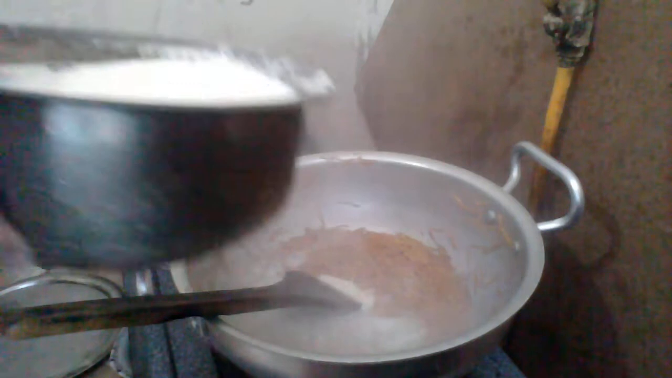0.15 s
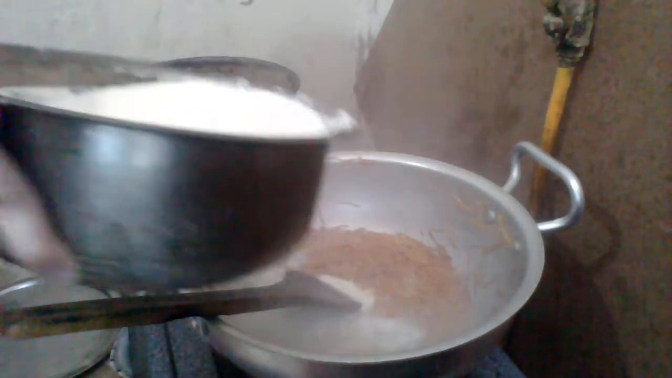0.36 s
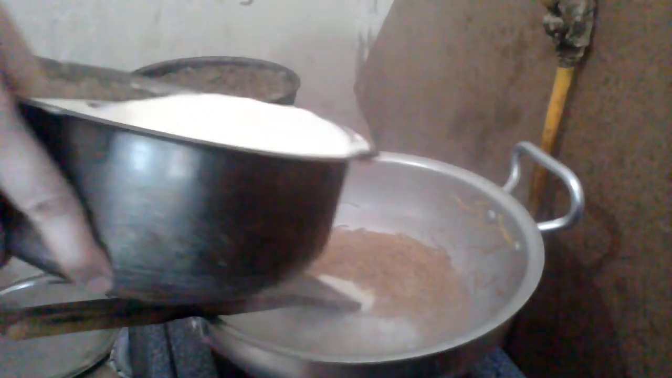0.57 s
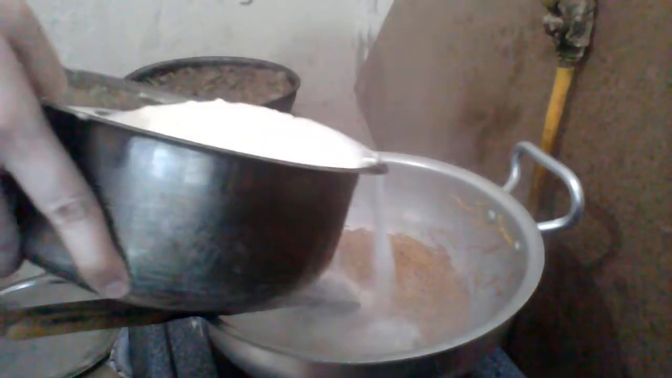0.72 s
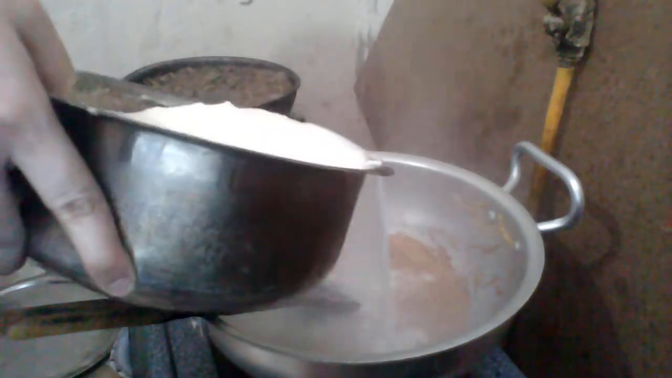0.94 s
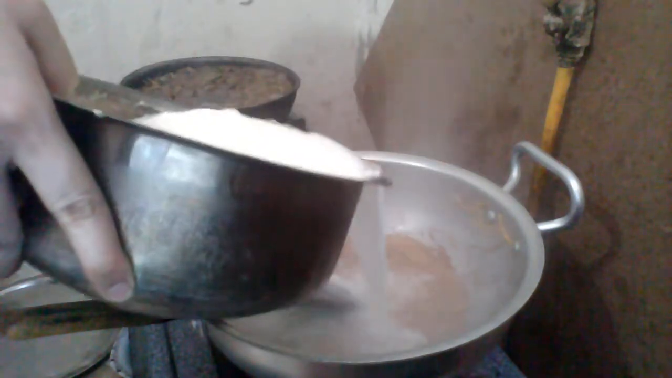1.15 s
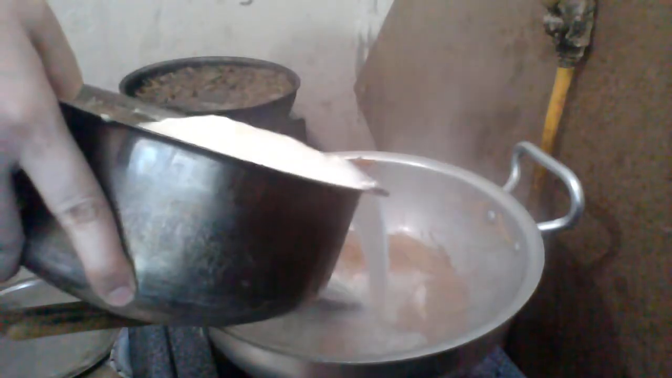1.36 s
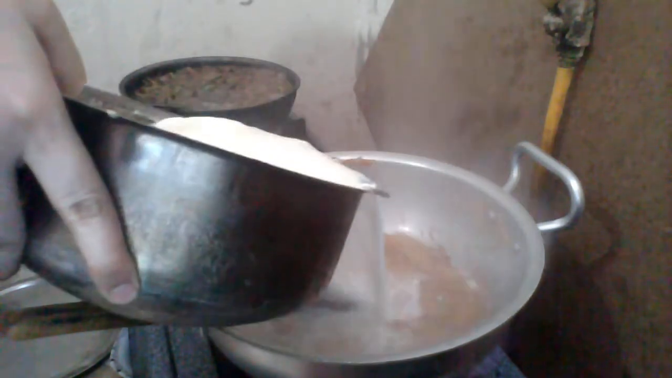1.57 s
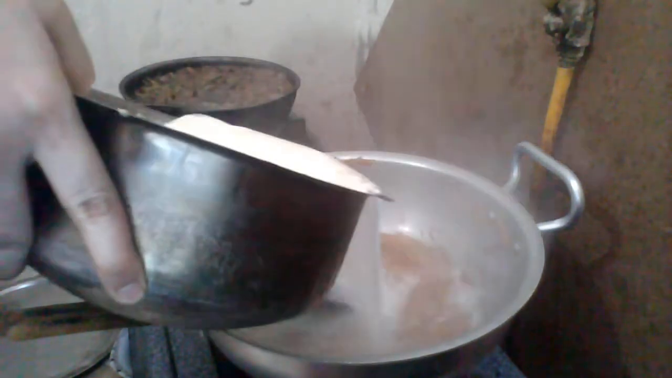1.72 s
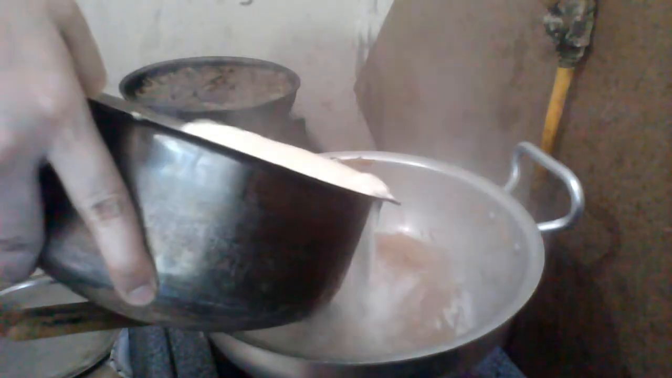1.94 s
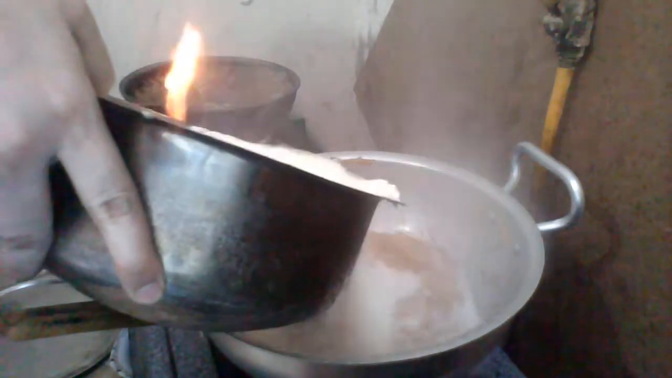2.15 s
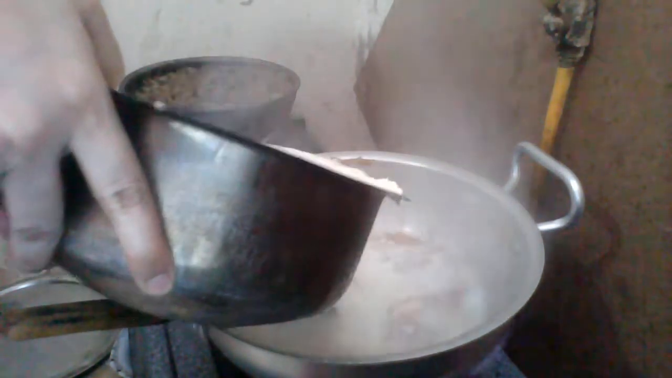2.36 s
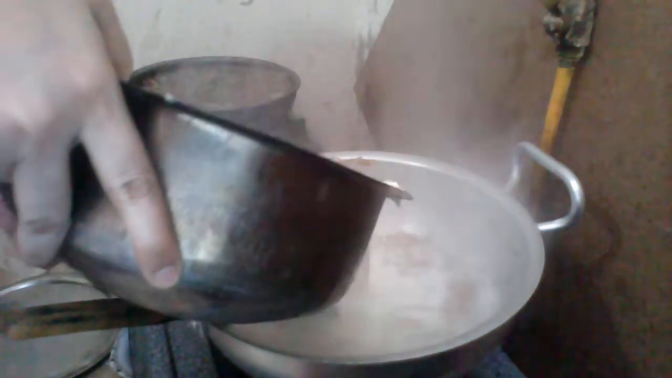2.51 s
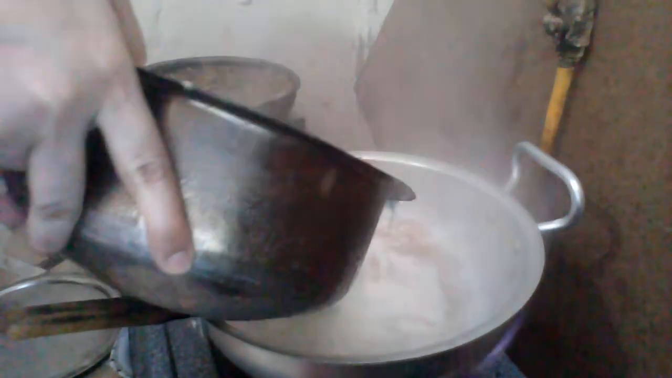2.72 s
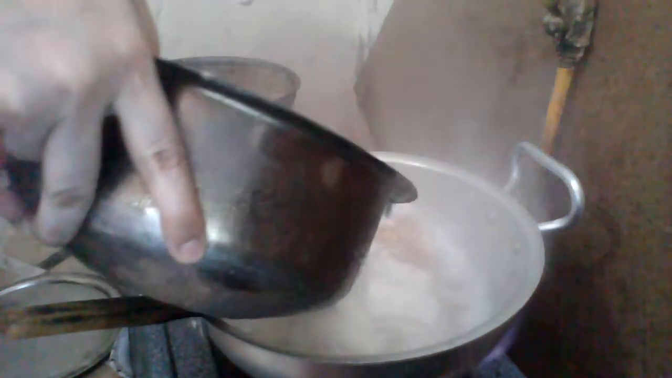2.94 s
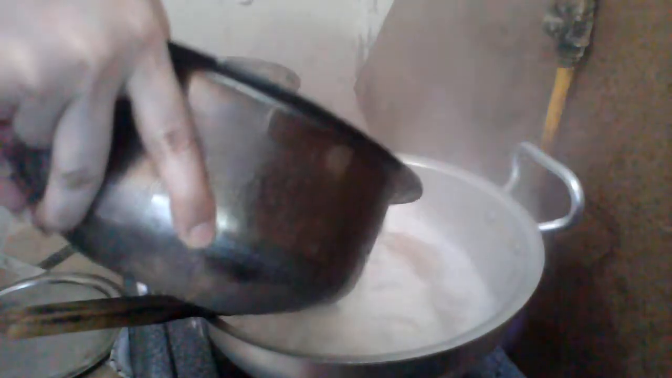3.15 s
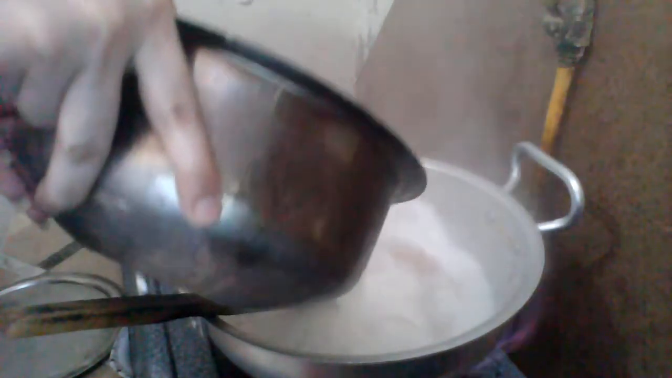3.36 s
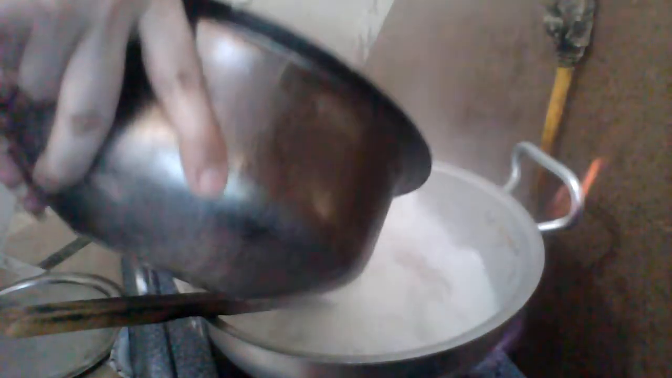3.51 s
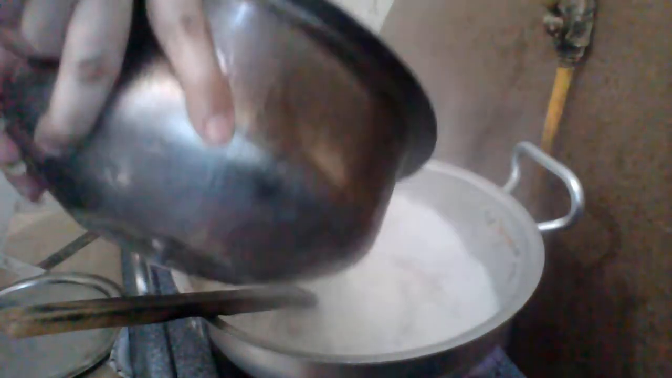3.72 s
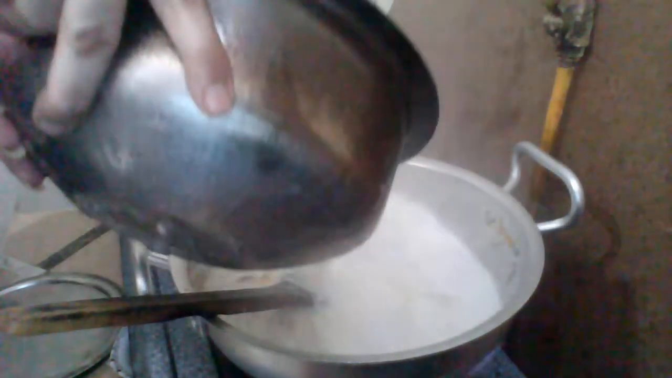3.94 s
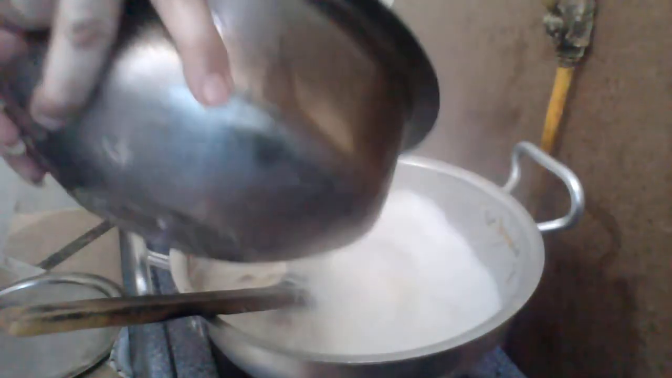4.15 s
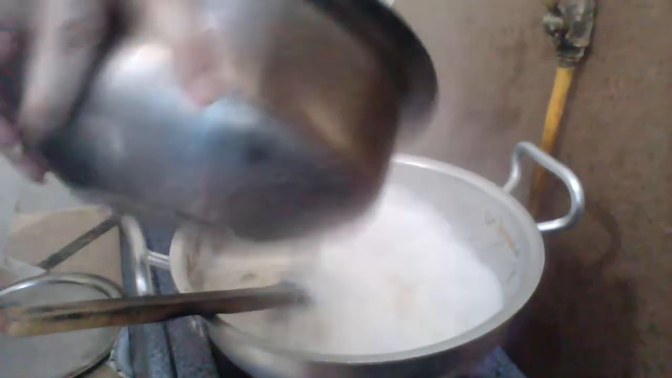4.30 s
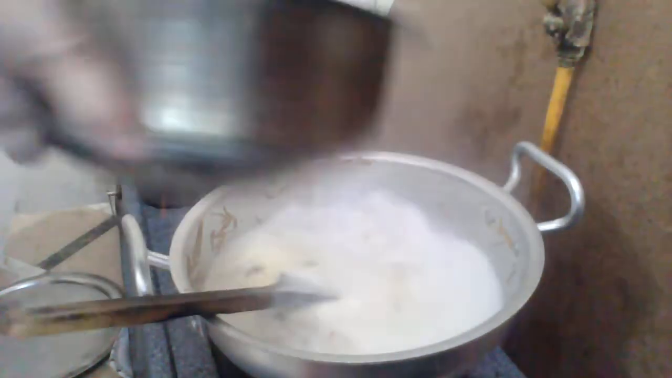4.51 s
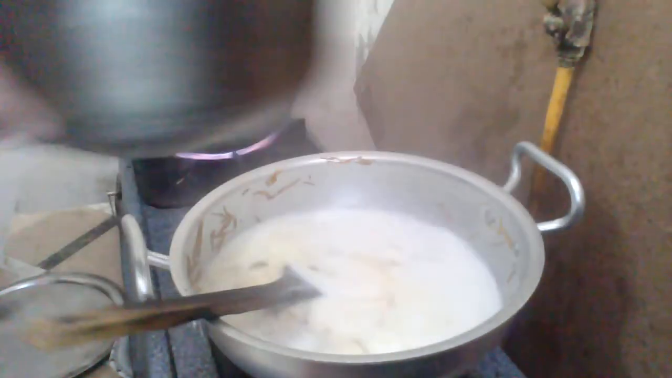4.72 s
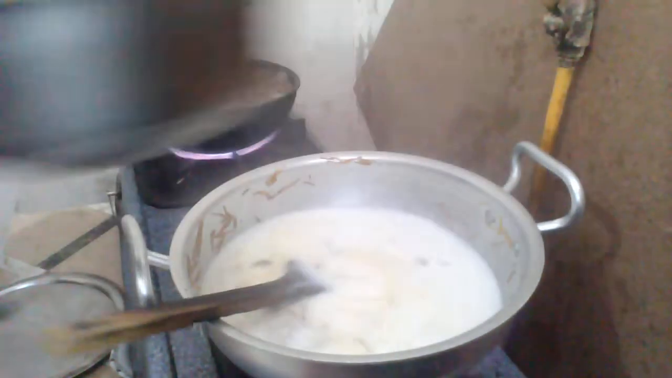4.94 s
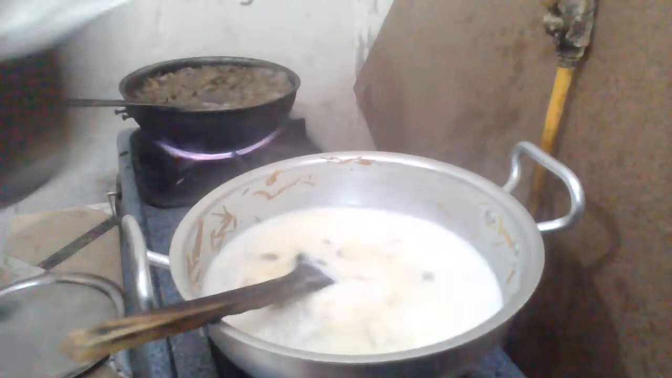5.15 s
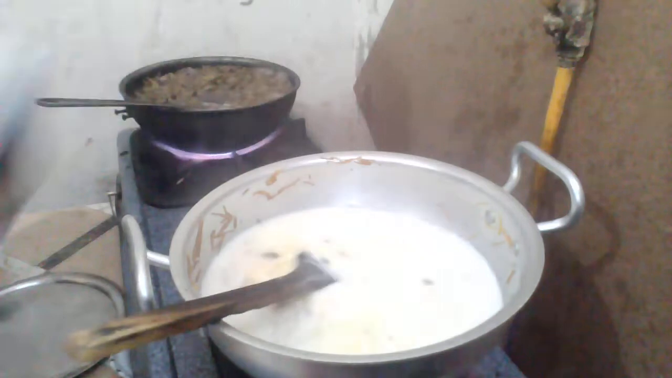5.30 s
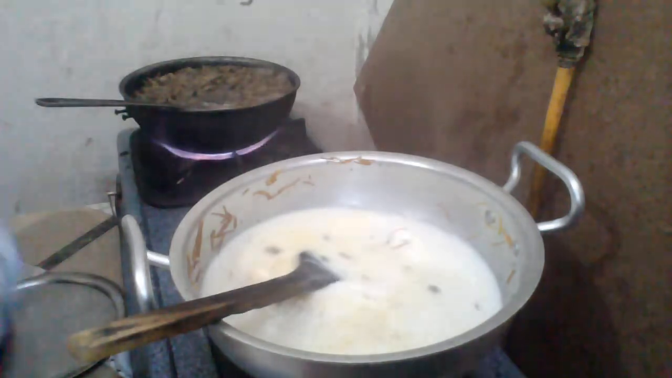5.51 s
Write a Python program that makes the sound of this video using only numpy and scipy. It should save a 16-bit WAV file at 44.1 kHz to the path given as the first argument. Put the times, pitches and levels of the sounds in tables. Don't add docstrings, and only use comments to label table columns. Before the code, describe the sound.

A steady fry hiss swells into singing, crackling steam as milk floods a hot pan, then dies away, heard through a thin voice link.

```python
import sys
import numpy as np
from scipy import signal
from scipy.fft import rfft, irfft, next_fast_len
from scipy.io import wavfile
from scipy.ndimage import uniform_filter1d, map_coordinates

SR = 44100
rng = np.random.default_rng(int(sys.argv[2]) if len(sys.argv) > 2 else 0)


def ratio(d):
    e = np.asarray(d, float) / 20
    return 10 ** e


def int16_out(signal):
    q = np.round(np.clip(np.atleast_2d(signal).T, -1, 1) * 32767)
    wavfile.write(sys.argv[1], SR, q.astype(np.int16))


N = 245504
TIME = np.arange(N) / SR


def unit(x):
    return x / np.sqrt(np.mean(x ** 2) + 1e-20)


def curves(rows):
    s, *columns = np.transpose(rows)
    return [np.interp(TIME, s, column) for column in columns]


def wobble(rate):
    knots = rng.standard_normal(int(N * rate / SR) + 4)
    return map_coordinates(knots, [np.arange(N) * rate / SR])


def coloured(x, spectrum):
    m = 2 * next_fast_len(N // 2 + 8192)
    hz, db = np.transpose(spectrum)
    log_hz = np.log(np.fft.rfftfreq(m, 1 / SR) + 1)
    gain = ratio(np.interp(log_hz, np.log(hz + 1), db, left=-90, right=-90))
    cepstrum = irfft(np.log(gain), m)
    cepstrum[1:m // 2] *= 2
    cepstrum[m // 2 + 1:] = 0
    response = np.exp(rfft(cepstrum))
    return unit(irfft(rfft(x, m) * response, m)[:N])


def rush(patchy_db, flutter_db):
    z = signal.stft(rng.standard_normal(N + 512), nperseg=512)[2]
    patches = uniform_filter1d(rng.standard_normal(z.shape), size=5, axis=0)
    patches = uniform_filter1d(patches, size=9, axis=1)
    noise = signal.istft(z * ratio(patchy_db * unit(patches)), nperseg=512)[1][:N]
    flutter = wobble(25) + 0.36 * wobble(8.8)
    return unit(noise * ratio(flutter_db * flutter))


def crackle(per_second, spread_db):
    chance, side, strength = rng.random((3, N))
    clicks = (chance < per_second / SR) * np.sign(side - .5)
    return unit(clicks * ratio(-spread_db * np.log(strength + .025)))


# (frequency [Hz], level [dB per Hz])
HOLLOW_HISS = [(250, -42.5), (430, -14.5), (531, -7), (576, -4.5), (695, -16), (817, -12.5), (969, -3),
               (1170, 3.5), (1260, 0), (1430, -5), (1700, 2), (2050, -0.5), (2610, 1), (2830, -7),
               (3000, -4), (3900, -22.5), (6600, -120)]
# (frequency [Hz], level [dB per Hz])
FAT_FIZZ = [(1530, -33), (2600, -2.5), (2910, -7.5), (3160, -1.5), (3850, -1.5), (4230, -4.5), (6260, -6),
            (7080, -13), (7530, -28), (8040, -43), (10500, -80), (17700, -120)]
# (time [s], level [dB])
FRYING = [(0.0, -56), (0.4, -56.5), (0.7, -57.5), (1.21, -54.5), (1.56, -52.5), (1.78, -52), (1.98, -52.5),
          (2.21, -52.5), (2.38, -51), (2.51, -47.5), (2.74, -55), (2.93, -55.5), (3.3, -56.5),
          (3.58, -59.5), (4.06, -60.5), (4.32, -64.5), (5.37, -71), (5.56, -72)]
# (time [s], delay [ms], share of the direct sound)
BOWL_ECHO = [
    (0, 0.91, 0.12),
    (.3, 0.23, 0.086),
    (.6, 0.25, 0.085),
    (1, 0.2, 0.18),
    (1.3, 0.19, 0.2),
    (5.57, 0.15, 0.026),
]


def sizzle():
    dry_fizz_db, wet_fizz_db, covered_s = -2, 0.68, 2.65
    heat_db, = curves(FRYING)
    fizz_db = heat_db + np.where(TIME < covered_s, dry_fizz_db, wet_fizz_db)
    fizz_db = uniform_filter1d(fizz_db, size=SR // 4)
    drops = crackle(900, spread_db=4.5)
    body = coloured(rush(patchy_db=1.0, flutter_db=0.92) + 0.4 * drops, HOLLOW_HISS)
    fizz = coloured(rush(patchy_db=1.18, flutter_db=0.93) + 0.55 * drops, FAT_FIZZ)
    hiss = ratio(heat_db + 9) * body + ratio(fizz_db + 10.0) * fizz
    delay_ms, share = curves(BOWL_ECHO)
    echo = map_coordinates(hiss, [np.arange(N) - delay_ms * SR / 1000], mode="nearest")
    return (hiss + share * echo) / np.sqrt(1 + share ** 2)


# (time [s], length [s], frequency [Hz], rms level [dB])
STEAM_POCKETS = [(0.972, 0.19, 947, -56.5), (1.021, 0.087, 1790, -52.5), (1.208, 0.22, 569.6, -56.5),
                 (1.257, 0.15, 5000, -58), (1.271, 0.043, 1653, -46.5), (1.407, 0.15, 1623, -49),
                 (1.421, 0.17, 1060, -46.5), (1.455, 0.14, 5920, -51.5), (1.528, 0.09, 1304, -49.5),
                 (1.529, 0.065, 2175, -48), (1.543, 0.061, 5000, -48.5), (1.547, .096, 3200, -45.5),
                 (1.547, 0.15, 6520, -55.5), (1.569, 0.1, 1708, -40), (1.588, 0.19, 619, -53),
                 (1.641, 0.2, 2295, -43), (1.653, 0.2, 3250, -44), (1.674, 0.08, 6670, -54.5),
                 (1.674, 0.16, 5020, -51.5), (1.682, 0.19, 1635, -41.5), (1.711, 0.15, 1250, -45),
                 (1.714, 0.15, 993, -45.5), (1.718, 0.13, 1850, -43.5), (1.741, 0.16, 5650, -54.5),
                 (1.776, 0.22, 615, -51), (1.822, 0.028, 2164, -42.5), (1.861, 0.096, 3230, -53),
                 (1.878, 0.17, 1673, -45), (1.898, 0.11, 2660, -43.5), (1.922, 0.088, 997, -45.5),
                 (1.959, 0.11, 6500, -52), (1.974, 0.12, 1139, -50.5), (2.011, 0.18, 4980, -51.5),
                 (2.02, 0.36, 1630, -46.5), (2.069, 0.21, 5520, -50.5), (2.107, 0.26, 2635, -46.5),
                 (2.113, 0.071, 3750, -47.5), (2.113, 0.37, 539.4, -53.5), (2.186, 0.27, 1017, -46),
                 (2.197, 0.25, 1880, -47.5), (2.261, 0.078, 3750, -45.5), (2.267, 0.14, 5510, -48.5),
                 (2.31, .099, 1725, -45.5), (2.313, 0.069, 4050, -48.5), (2.316, 0.34, 6400, -50),
                 (2.325, 0.039, 2640, -48), (2.371, 0.2, 5560, -46.5), (2.374, .093, 3785, -46),
                 (2.395, 0.073, 2640, -40), (2.392, 0.21, 4760, -45), (2.403, 0.24, 638, -47),
                 (2.406, 0.23, 1060, -45.5), (2.418, 0.14, 1713, -40.5), (2.482, 0.16, 2667, -45),
                 (2.543, 0.093, 3706, -44), (2.563, 0.089, 2070, -43.5), (2.572, 0.069, 1740, -45),
                 (2.575, 0.1, 3535, -41), (2.586, 0.09, 5570, -40.5), (2.644, 0.19, 649, -50),
                 (0.173, 0.073, 1277, -53.5), (0.745, 0.076, 577, -59.5), (1.027, .023, 1250, -54.5),
                 (1.44, 0.12, 7440, -66.5), (1.721, .06, 7300, -65), (1.495, 0.087, 5360, -56),
                 (1.509, 0.075, 575, -60), (1.74, 0.095, 500, -51.5), (1.875, 0.11, 1236, -50.5),
                 (1.948, 0.28, 7360, -68), (2.008, 0.15, 565, -55), (2.096, 0.19, 859, -56),
                 (2.145, 0.18, 6650, -54.5), (2.164, .113, 4730, -55), (2.228, 0.18, 2100, -52.5),
                 (2.303, 0.16, 6770, -52.5), (2.322, 0.2, 7420, -63), (2.36, 0.17, 6120, -49),
                 (2.397, 0.11, 1500, -47.5), (2.461, 0.1, 2160, -49), (2.514, 0.2, 7070, -54.5),
                 (2.555, 0.084, 1396, -50), (2.577, 0.1, 7360, -58), (2.603, 0.14, 2572, -45),
                 (2.61, 0.17, 2210, -53.5), (2.631, 0.12, 1024, -50), (2.662, 0.092, 6300, -51.5),
                 (3.17, 0.065, 1417, -61), (1.31, .06, 1640, -56), (2.761, 0.11, 2600, -59),
                 (3.0, 0.4, 2640, -56), (2.796, .2, 1686, -57.5), (3.199, 0.21, 1750, -64),
                 (3.3, 0.27, 1200, -63.5), (3.451, 0.43, 2596, -61), (0.092, .03, 1797, -51.5),
                 (.2, .04, 2300, -59), (4.3, 0.48, 2490, -68), (4.84, 0.099, 2530, -63),
                 (1.23, .1, 720, -61.5), (1.74, .15, 798, -57.5), (2.64, 0.096, 522, -55.5),
                 (2.22, .1, 1134, -47.5), (1.428, 0.054, 1011, -50.5), (1.72, .14, 6180, -54.5),
                 (1.561, .03, 1740, -50)]
# (time [s], frequency [Hz], rms level [dB])
COLLAPSES = [
    (1.604, 1706, -34.5),
    (1.669, 1640, -37.5),
    (1.67, 2310, -38.5),
    (2.168, 1630, -43),
    (2.618, 2085, -44),
    (1.82, 1688, -38),
    (1.964, 2650, -45),
    (2.424, 2640, -37.5),
    (2.653, 5530, -44),
    (3.305, 1150, -50),
]
# (time [s], length [s], frequency [Hz], rms level [dB])
BIG_BUBBLES = [(1.259, 0.049, 370, -65.5), (1.36, 0.13, 154, -65), (1.428, 0.049, 95, -69),
               (1.436, 0.043, 262, -69.5), (1.57, .08, 378, -62.5), (1.69, 0.056, 116, -66),
               (1.728, 0.13, 350, -52), (1.967, 0.046, 330, -61), (2.115, 0.086, 304, -59.5),
               (2.19, 0.17, 146, -60.5), (2.221, 0.04, 225, -59), (2.248, 0.061, 280, -52.5),
               (2.314, .04, 90, -70), (2.36, 0.13, 140, -65.5), (2.396, 0.16, 262, -61.5),
               (2.495, 0.13, 101, -60), (2.527, 0.17, 320, -51.5), (2.635, 0.076, 121, -53),
               (2.653, 0.037, 210, -55.5), (2.701, 0.19, 106, -64), (2.755, .06, 317, -59),
               (2.821, 0.096, 258, -60.5), (2.822, 0.083, 374, -61), (2.981, 0.044, 287, -67),
               (3.114, 0.12, 362, -62.5), (3.21, 0.12, 153, -64), (3.228, .12, 242, -60),
               (3.42, 0.096, 175, -63), (3.26, 0.32, 330, -66), (3.662, .05, 156, -73.5),
               (4.45, 0.055, 111, -73)]


def singing_pockets():
    pocket_hz, knock_hz, knock_s = 140, 200, 0.012
    ring_db, knock_ring_db, no_ring_db = -5, 5, -40
    ring_from_hz = 450
    bubble_width, bubble_db = 0.39, -3.5
    rows = []
    for s, length, hz, db in STEAM_POCKETS:
        width = pocket_hz * (hz / 2000) ** 0.14
        rows.append((s, length, hz, db, width, ring_db))
    for s, hz, db in COLLAPSES:
        rows.append((s, knock_s, hz, db, knock_hz, knock_ring_db))
    for s, length, hz, db in BIG_BUBBLES:
        rows.append((s, length, hz, db + bubble_db, bubble_width * hz, ring_db))
    return [(*row[:5], no_ring_db if row[2] < ring_from_hz else row[5]) for row in rows]


def singing():
    core_db, core_width = -5, 0.037
    rise, glide = 0.37, .012
    out, count = np.zeros(N + SR), SR // 2
    f, t = np.fft.rfftfreq(count, 1 / SR), np.arange(count) / SR
    for s, length, hz, db, width, ring_db in singing_pockets():
        off = (f - hz) / (width / 2)
        shape = 1 / (1 + off ** 4) + ratio(core_db) / (1 + (off / core_width) ** 2)
        driven = rfft(rng.standard_normal(count)) * shape
        driven[np.abs(off).argmin()] += ratio(ring_db) * np.linalg.norm(driven)
        band = np.fft.ifft(driven, count)
        drift = glide * rng.standard_normal() * hz * t * (t / (length + 0.049) - 1)
        band = (band * np.exp(1j * np.pi * drift)).real
        edge = min(.026, .6 * length)
        growing = (t - (1 - rise) * edge / 2) / (rise * edge)
        fading = (length + 2 * edge - t) / (3 * edge)
        swell = np.sin(np.pi / 2 * np.clip(np.minimum(growing, fading), 0, 1)) ** 2
        out[round(s * SR):][:count] += ratio(db) * unit(band * swell) * np.sqrt(np.mean(swell > 0))
    return np.roll(out, -round(.01 * SR))[:N]


# (time [s], peak level [dB], frequency [Hz])
DROPLETS = [(0.0513, -33, 2220), (0.9218, -32, 3400), (0.9981, -26, 3540), (1.0291, -30, 2430),
            (1.1842, -30, 3640), (1.2645, -27, 3260), (1.3234, -32, 1900), (1.5589, -28, 2170),
            (1.6636, -20.5, 1900), (1.9145, -28, 2680), (1.9624, -27, 2640), (2.1006, -30, 5000),
            (2.1655, -26, 1900), (2.412, -22, 3000), (2.506, -22, 2600), (2.7571, -30, 2200),
            (3.1363, -28.5, 2590), (3.3029, -22, 2100), (3.4094, -32, 3900), (3.497, -32, 3160),
            (4.0985, -35, 3000), (4.2448, -29, 2000), (4.4787, -34, 2990), (4.5106, -38, 3570),
            (4.7794, -41, 4370), (4.9150, -42, 2540), (4.9182, -29, 2500), (5.3577, -47, 2450)]
# (delay [ms], level [dB])
WALL_ECHOES = [
    (1.0, -5),
    (2.1, -11),
    (3.4, -12),
    (5.1, -14),
    (7.9, -15),
]


def pops():
    out, t = np.zeros(N + SR), np.arange(900) / SR

    def burst(hz, late):
        return np.sin(2 * np.pi * 1.3 * hz * (t - late)) * ratio(-60 * (t - late) / .0013) * (t > late)

    for s, db, hz in DROPLETS:
        spray = rng.standard_normal(len(t)) * ratio(-14.5 - 60 * t / .025)
        echoes = sum(ratio(echo_db) * burst(hz, ms / 1000) for ms, echo_db in WALL_ECHOES)
        out[round((s + .0009) * SR):][:len(t)] += ratio(db) * (burst(hz, 0) + spray + echoes)
    band = signal.cheby2(6, 55, [900, 7900], "bandpass", fs=SR, output="sos")
    return ratio(4) * signal.sosfilt(band, out[:N])


# (frequency [Hz], level [dB])
PAN_TONES = [(500, -4.5), (676, -3.5), (1060, -9.5), (1630, 2), (1880, -3.5), (2180, -2), (2640, -4.5),
             (3250, -8.5), (5000, -7), (5380, -6.5), (5720, -4.5), (6120, -4.5), (6570, -6), (850, -10.5)]
# (time [s], level [dB])
TRAPPED_STEAM = [
    (1.15, -75.5),
    (1.45, -66),
    (1.75, -51.5),
    (1.9, -56),
    (2.08, -53.5),
    (2.35, -50),
    (2.62, -48.5),
    (2.76, -54),
    (3.0, -64),
    (3.7, -80),
]


def murmur():
    width_hz, flicker_db, flickers_per_s = 63, 5.5, 7.524
    f = np.fft.rfftfreq(N, 1 / SR)
    out = np.zeros(N)
    for hz, db in PAN_TONES:
        shape = 1 / (1 + ((f - hz) / (width_hz / 2)) ** 4)
        band = unit(irfft(rfft(rng.standard_normal(N)) * shape, N))
        out += ratio(db + flicker_db * (wobble(flickers_per_s) - 1)) * band
    return ratio(curves(TRAPPED_STEAM)[0]) * out


# (frequency [Hz], level [dB per Hz])
SLOSH_COLOUR = [(55, -24), (80, -3), (120, 0), (200, -3), (250, -30)]
# (frequency [Hz], level [dB per Hz])
BOIL_COLOUR = [(165, -30), (215, 0), (385, -1), (445, -22)]
# (frequency [Hz], level [dB per Hz])
AIR_COLOUR = [(15, -6), (30, 0), (55, -20)]
# (time [s], half length [s], level [dB])
WARM_PUFFS = [
    (1.713, 0.045, -71),
    (2.0, 0.078, -89),
    (2.794, 0.19, -82),
    (3.42, 0.15, -76),
    (5.52, 0.084, -79),
]


def gurgle():
    boil = ratio(curves(TRAPPED_STEAM)[0] - 14.5)
    air = ratio(-96)
    for s, half, db in WARM_PUFFS:
        air = air + ratio(db) * np.exp(-((TIME - s) / half) ** 2)
    layers = [(ratio(-78) + 0.17 * boil, SLOSH_COLOUR), (ratio(-78.5) + boil, BOIL_COLOUR), (air, AIR_COLOUR)]
    out = np.zeros(N)
    for gain, colour in layers:
        uneven = rng.standard_normal(N) * ratio(3.1 * wobble(14))
        out += gain * coloured(uneven, colour)
    return out


def scene():
    return np.tile(sizzle() + singing() + pops() + murmur() + gurgle(), (2, 1))


def band_limit(x):
    return signal.sosfilt(signal.butter(12, 15500, fs=SR, output="sos"), x)


# (time [s], length [s], threshold [dB])
OVERLOADS = [(.6, .03, -3), (.885, .04, 1), (1.022, .045, 4), (1.185, .04, 1), (1.4, .03, -1),
             (1.505, .03, -1), (1.70, .03, -2), (1.76, .03, -2), (2.27, .03, -3), (2.355, .03, -2),
             (3.215, .04, 1), (3.712, .045, 4), (3.77, .03, -2), (4.43, .03, 0)]


def record(dry):
    link_rate, link_top_hz = 16000, 8250
    f, t, z = signal.stft(dry[0], SR, nperseg=2048, noverlap=1536)
    power = np.abs(z) ** 2 + 1e-20
    local = np.abs(uniform_filter1d(power, size=25, axis=0)) + 1e-20
    keep = (power / local) ** 0.018
    bar = local ** .6 * power[f < link_rate / 2].mean(0) ** .4
    smooth = uniform_filter1d(power, size=3, axis=0)
    for s, length, over_db in OVERLOADS:
        now = np.abs(t - s) < length / 2
        weak = smooth < bar * ratio(2 * over_db - 8)
        keep[:, now] *= np.where(weak, ratio(-20), 1)[:, now]
    keep *= np.sqrt(power.sum(0) / (power * keep ** 2).sum(0))
    passed = z * keep * (f < link_top_hz)[:, None]
    x = signal.istft(passed, SR, nperseg=2048, noverlap=1536)[1][:N]
    mirror = x * np.cos(2 * np.pi * link_rate * TIME) + ratio(-43.5) * rng.standard_normal(N)
    treble = signal.butter(8, [9800, 15500], "bandpass", fs=SR, output="sos")
    x = x + ratio(-55.5) * signal.sosfilt(treble, mirror)
    return band_limit(np.tile(x, (2, 1)))


dry = scene()
out = record(dry)
int16_out(out)
```